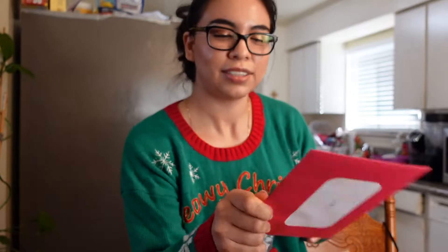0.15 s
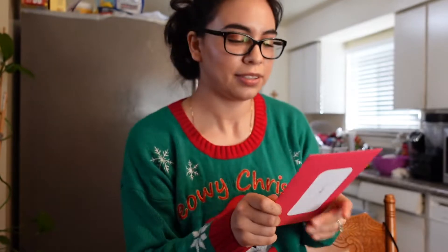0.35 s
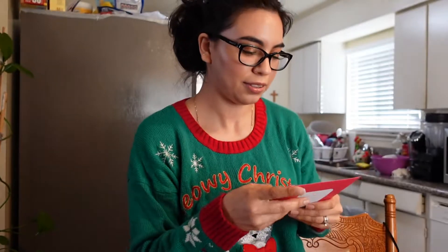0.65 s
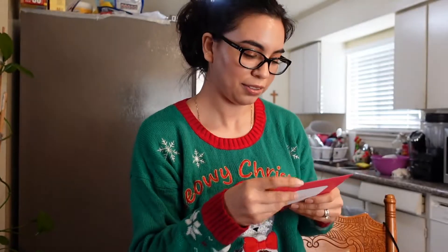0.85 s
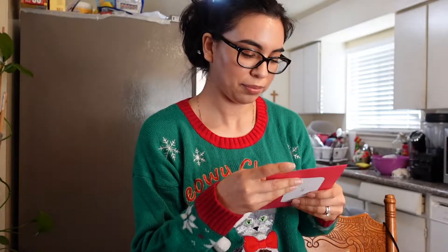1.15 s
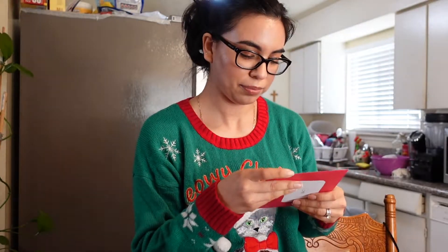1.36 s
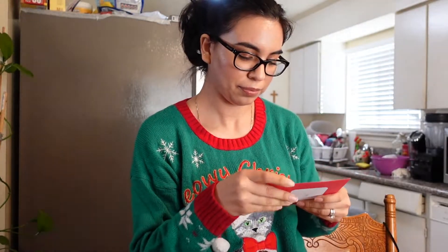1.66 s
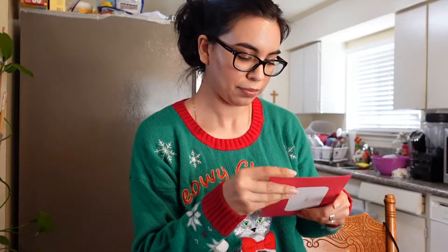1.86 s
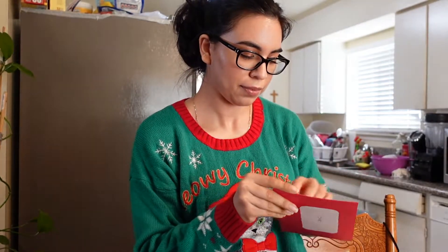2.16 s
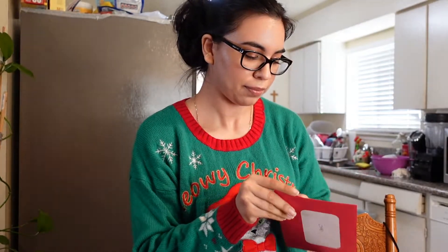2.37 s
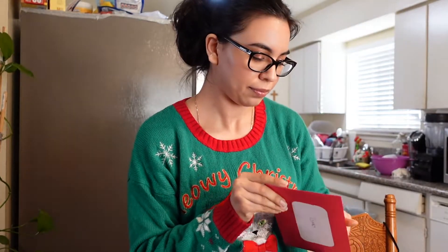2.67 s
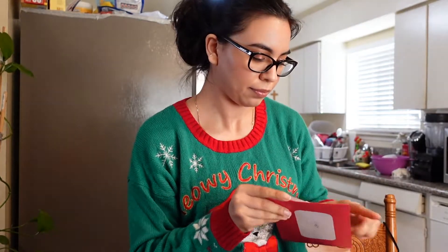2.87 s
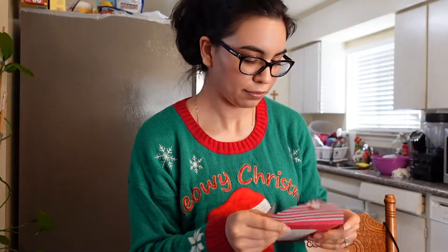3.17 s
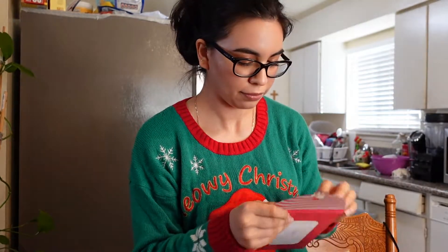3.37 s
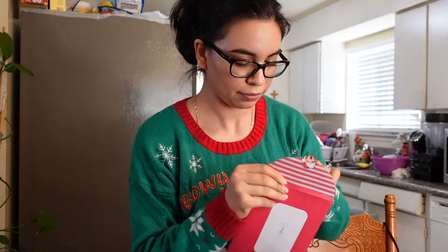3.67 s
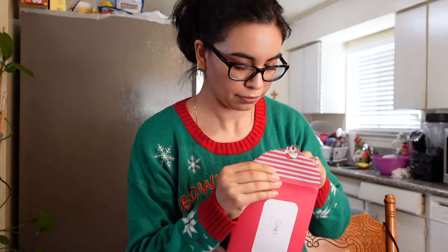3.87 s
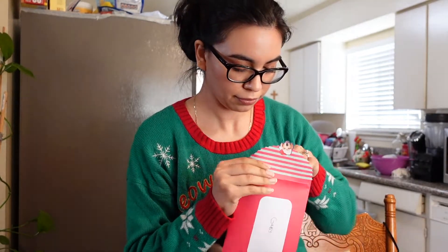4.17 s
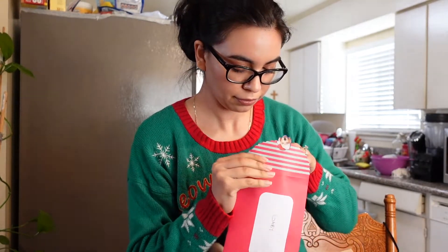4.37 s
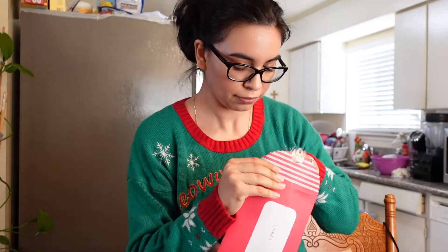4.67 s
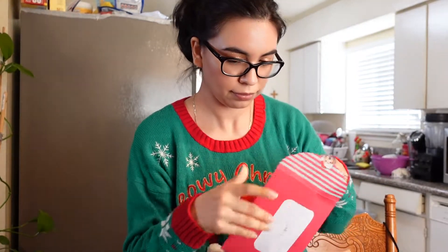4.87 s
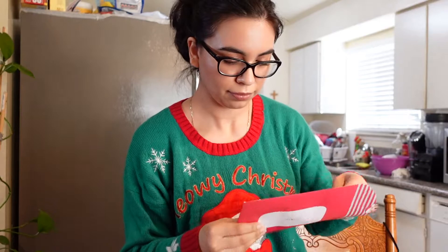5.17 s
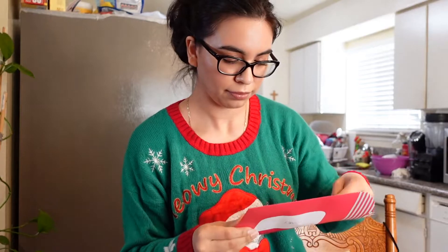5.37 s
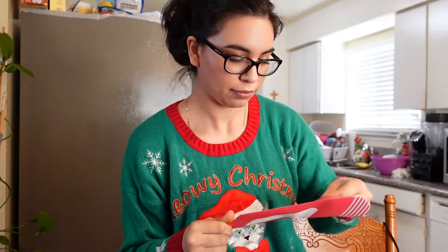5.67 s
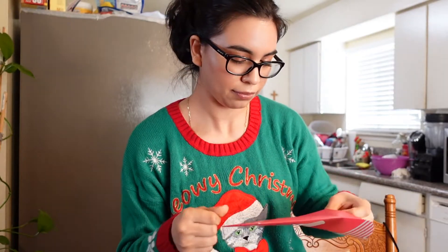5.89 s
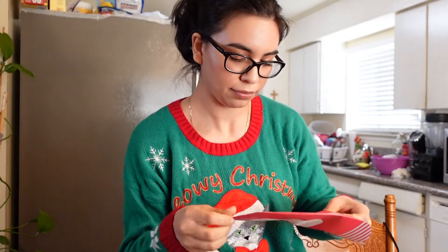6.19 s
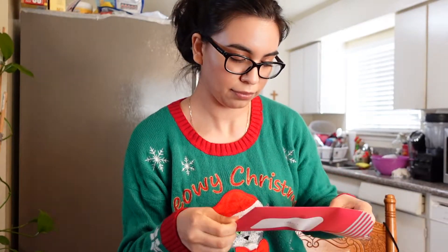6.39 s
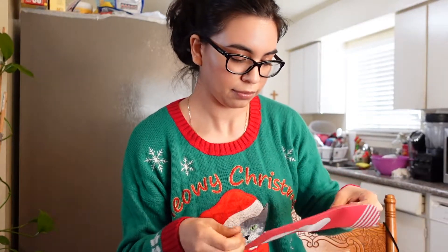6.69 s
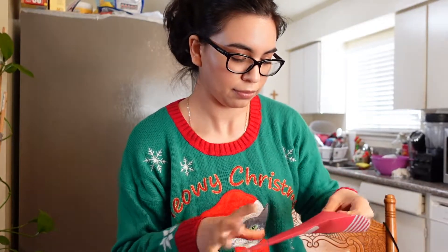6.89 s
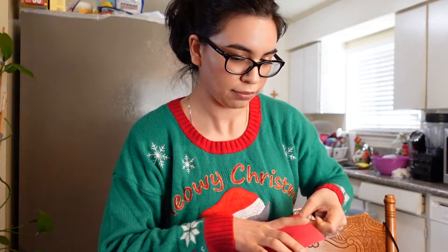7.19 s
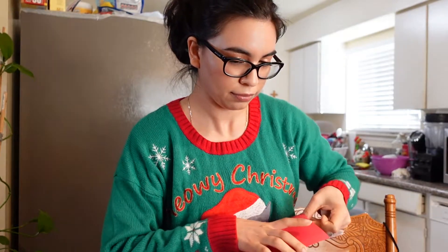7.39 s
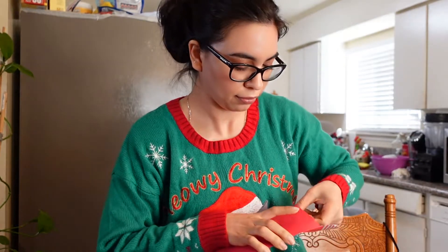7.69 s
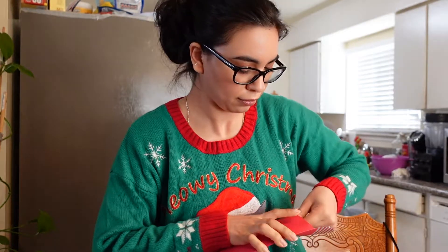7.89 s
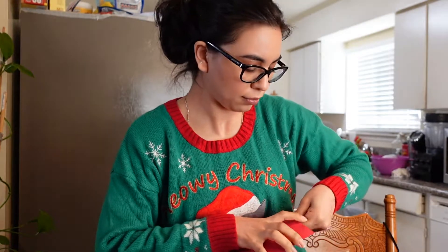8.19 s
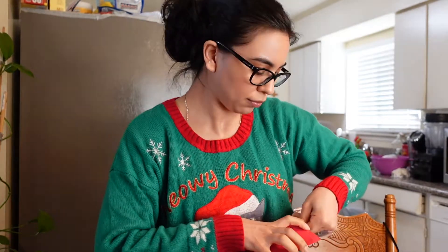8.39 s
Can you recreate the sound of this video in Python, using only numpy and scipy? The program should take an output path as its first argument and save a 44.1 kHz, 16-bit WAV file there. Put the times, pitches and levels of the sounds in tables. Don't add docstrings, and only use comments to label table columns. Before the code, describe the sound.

Dry paper sounds in a quiet kitchen, heard close. Nearly silent fingering and small creases come first, then sharp snaps, a high sticky squeal lasting under half a second, and the loudest tearing bursts around it. Later the sound thins to soft boxy rustling, isolated crackles, dull knocks and light metallic jingles, ending in sparse quiet creases over faint air and a distant hum.

```python
import sys
import numpy as np
from scipy import signal
from scipy.fft import rfft, irfft, next_fast_len
from scipy.io import wavfile
from scipy.ndimage import uniform_filter1d

SR = 44100
rng = np.random.default_rng(int(sys.argv[2]) if len(sys.argv) > 2 else 0)


def volts(x):
    e = np.asarray(x, float) / 20
    return 10 ** e


def wav_record(signal):
    frames = np.transpose(np.atleast_2d(signal))
    bounded = np.clip(frames, -1, 1)
    quanta = np.round(bounded * 32767).astype(np.int16)
    wavfile.write(sys.argv[1], SR, quanta)


N = 376613


def rms_one(x):
    return x / np.sqrt(np.mean(x ** 2) + 1e-20)


def peak_one(x):
    return x / np.abs(x).max()


def butter(x, order, hz, kind="low"):
    return signal.sosfilt(signal.butter(order, hz, kind, fs=SR, output="sos"), x)


def in_time(rows):
    s, *columns = np.transpose(rows)
    return [np.interp(np.arange(N) / SR, s, c) for c in columns]


def at_hz(points, hz):
    table_hz, values = np.transpose(points)
    return np.interp(np.log(hz), np.log(table_hz), values)


def colour(x, points):
    size = next_fast_len(N)
    hz = np.maximum(np.arange(size // 2 + 1) * SR / size, 1)
    below, above = np.maximum(points[0][0] / hz, 1), np.maximum(hz / points[-1][0], 1)
    gain = volts(at_hz(points, hz) - 9.4 * np.log2(below * above))
    return rms_one(irfft(rfft(x, size) * gain, size)[..., :N])


def drift(rate_hz):
    r = np.exp(-2 * np.pi * rate_hz / SR)
    return rms_one(signal.lfilter([1], [1, -2 * r, r * r], rng.standard_normal(N + SR))[SR:])


def resonance(x, hz, width_hz):
    r = np.exp(-np.pi * width_hz / SR)
    poles = [1, -2 * r * np.cos(2 * np.pi * hz / SR), r * r]
    return signal.lfilter([(1 - r * r) / 2, 0, (r * r - 1) / 2], poles, x)


def pair(likeness, size=N):
    fast = next_fast_len(size)
    c = np.clip(at_hz(likeness, np.arange(1, fast // 2 + 2) * SR / fast), 0, 1)
    mid, side = rfft(rng.standard_normal((2, fast)))
    mid, side = np.sqrt((1 + c) / 2) * mid, np.sqrt((1 - c) / 2) * side
    return irfft(mid + side * [[1], [-1]], fast)[:, :size]


# start_s, peak_db, sheet_ring_hz, pocket_thump_db, top_edge_db
CRACKS = [(1.682, -15.5, 4950, -29, -54), (1.9657, -18.5, 4550, -22.5, -20), (2.319, -28, 2800, -24, -55),
          (2.4292, -12.5, 2647, -24, -17), (2.5096, -20, 1570, -12.5, -27), (2.62, -12.5, 3300, -17.5, -14),
          (2.6511, -8.5, 2400, -18.5, -12.5), (2.9951, -10, 2990, -26.5, -21),
          (3.0178, -20, 1900, -12, -16), (3.2322, -37, 4320, -50, -27), (3.2388, -28, 4000, -50, -24),
          (3.273, -33.5, 2020, -34, -18), (3.3326, -26, 2550, -10, -25), (3.894, -16, 3830, -14, -40),
          (3.9084, -19, 2960, -18.5, -50), (4.581, -22.5, 2070, -21.5, -32),
          (4.701, -23.5, 2080, -12.5, -58), (5.21, -31, 4470, -17.5, -19), (5.8221, -25.5, 4600, -17, -39),
          (5.9761, -23, 4360, -19, -29), (7.1679, -30.5, 1870, -16.5, -28), (7.2196, -31.5, 3600, -11, -32),
          (7.868, -32, 2150, -15.5, -14.5), (8.2037, -30, 2900, -14, -27), (8.3826, -35, 4570, -16, -25)]
# start_s, peak_db, sheet_ring_hz, pocket_thump_db
CREASES = [(0.4464, -37, 2760, -15), (.456, -37, 4500, -14), (1.4524, -36.5, 3700, -57),
           (3.491, -43, 1380, -3), (3.5823, -38, 3600, -8), (3.599, -29.5, 1340, -7),
           (3.6223, -49.5, 1310, 11.5), (3.7215, -46.5, 1270, 8), (3.879, -32, 905, -21),
           (4.3106, -40.5, 2000, -5), (4.3675, -49, 2880, -1), (4.6312, -36, 2600, -5),
           (4.858, -39, 2420, -11.5), (5.1073, -45, 2520, -17), (5.567, -40.5, 2700, -24),
           (6.2884, -46, 4350, -12), (6.545, -45, 3360, -18), (6.774, -43, 2520, -18),
           (6.834, -43.5, 1530, -16), (6.888, -44.5, 1180, -7.5), (7.5328, -38.5, 4300, -16),
           (7.567, -36.5, 1390, -20), (7.7075, -43, 1987, -43)]
# start_s, peak_db, sheet_ring_hz
TICKS = [(0.09, -57, 1710), (1.953, -28, 8500), (2.4225, -33, 5740), (2.464, -19.5, 10200),
         (2.469, -29, 10500), (2.585, -46, 11000), (3.665, -53, 5500), (0.3264, -44, 6940),
         (0.889, -47, 1550), (1.2964, -43.5, 10300), (1.385, -48, 2290), (1.595, -48, 6000),
         (2.9504, -39, 3060), (4.1522, -46, 1610), (5.032, -45, 8980), (5.686, -64, 10300),
         (5.718, -51, 11000), (6.145, -37, 9000), (6.305, -63, 4500), (6.42, -46.5, 7150),
         (6.981, -42, 1000), (7.197, -36.5, 1190)]
# start_s, peak_db, sheet_ring_hz, pocket_thump_db, rip_ms
RIPS = [
    (1.977, -24.5, 4570, -32, 9.3),
    (2.452, -17.5, 3570, -31, 17),
    (2.4628, -18.5, 4740, -28, 7),
    (2.661, -12.5, 3040, -33, 9.7),
    (3.0105, -12.5, 5700, -23, 8.8),
    (3.79, -40, 1260, -2, 13),
    (4.65, -32.5, 1770, -12, 16),
    (7.354, -43, 1800, -20, 8),
    (7.7473, -36, 2770, -22, 2.3),
]
CRACK_MS, CREASE_MS, TICK_MS = 1.73, 1.72, 2.4
CREASE_EDGE_DB, TICK_EDGE_DB, RIP_EDGE_DB, TICK_THUMP_DB = -20.5, -14.5, -41, -34


def crease_rows():
    rows = [(*r, CRACK_MS) for r in CRACKS]
    rows += [(*r, CREASE_EDGE_DB, CREASE_MS) for r in CREASES]
    rows += [(*r, TICK_THUMP_DB, TICK_EDGE_DB, TICK_MS) for r in TICKS]
    return rows + [(*r, RIP_EDGE_DB, rip_ms) for *r, rip_ms in RIPS]


# pitch_hz, width_hz, level_db
POCKET = [(230, 90, -14), (640, 70, 0), (1270, 220, -9), (1850, 170, -7)]


def pocket(x):
    return sum(volts(db) * (-1) ** k * resonance(x, hz, width) for k, (hz, width, db) in enumerate(POCKET))


KNEE_HZ, KNEE_PER_RING = 1200, 1.64


def snap(ring_hz, thump_db, edge_db, rip_ms):
    t = np.arange(2048) / SR
    crack, push = rng.standard_normal((2, len(t)))
    age = 1000 * t / np.clip(rip_ms, .2, 14)
    burst = 0.42 * crack * np.abs(push) ** 1.57 * np.exp(-age) * (1 - np.exp(-3.5 * age))
    burst[0] = np.clip(1.31 / rip_ms, 0, 1) ** 2
    lines = rfft(burst)
    burst = irfft(lines / np.abs(lines), len(t)) * np.exp(-age / 4)
    knee_hz = np.clip(KNEE_HZ + KNEE_PER_RING * ring_hz, 2000, 9000)
    middle = butter(burst, 3, [500 + 0.28 * ring_hz, knee_hz], "band")
    edge = butter(burst, 2, [.8 * knee_hz, 15000], "band")
    ring = resonance(burst, ring_hz, 0.4 * ring_hz)
    ring = ring + 0.42 * resonance(burst, 1.76 * ring_hz, 0.65 * ring_hz)
    body = peak_one(butter(peak_one(middle) + 4.9 * peak_one(ring), 2, 0.99 * knee_hz))
    thump = pocket(push * np.exp(-t / .003))
    return body + volts(edge_db + 9.5) * peak_one(edge) + volts(thump_db + 6) * peak_one(thump)


def creases():
    out = np.zeros(N + 2048)
    for s, db, *shape in crease_rows():
        out[round(s * SR):][:2048] += volts(db + 1.0) * snap(*shape)
    return out[:N]


# start_s, peak_db, pitch_hz
THUMPS = [(.205, -60, 474), (0.261, -47.5, 480), (2.458, -42.5, 211), (2.665, -45, 205), (3.336, -42, 434),
          (3.594, -33, 484), (3.895, -26.5, 624), (5.981, -57, 112), (7.194, -35.5, 253), (7.221, -54, 170),
          (7.265, -51, 300)]
# start_s, peak_db, pitch_hz, width_hz
RINGS = [(.251, -48.5, 6900, 450), (1.683, -32, 1150, 600), (2.001, -53, 645, 350), (7.2, -42, 690, 200),
         (.257, -48, 10540, 350), (.331, -43, 9500, 1200), (1.292, -48, 10530, 400),
         (1.298, -57, 10500, 150), (1.298, -58, 7070, 150), (1.388, -46, 10600, 450), (.082, -62, 1710, 90),
         (.118, -62, 1960, 89), (.125, -57, 2870, 150), (.215, -49.5, 463, 90), (.372, -52, 2550, 300),
         (4.382, -52, 633, 80), (4.412, -48, 610, 80), (4.545, -46.5, 620, 80), (4.662, -39.5, 643, 49.7),
         (6.145, -50.5, 1510, 200), (2.43, -17, 2420, 504), (2.6215, -10.5, 5000, 2000),
         (2.6513, -10, 5000, 1500), (2.6612, -11.5, 2310, 700), (2.661, -7, 5370, 1800),
         (2.667, -13, 6000, 2500), (2.47, -32.5, 565, 151), (2.997, -14, 8700, 3000),
         (3.582, -35.5, 5500, 1500), (3.8945, -25, 2330, 500), (3.909, -17, 4470, 1500),
         (3.909, -27, 2080, 500), (4.311, -36.5, 620, 250), (5.8226, -25, 2730, 550),
         (5.9766, -19.5, 2420, 600), (7.194, -37.5, 524, 300), (8.3826, -28.5, 1520, 600),
         (8.2036, -23.5, 3640, 884), (8.3826, -28, 4150, 1200),
         (0.267, -56, 10800, 400), (.266, -53, 7700, 500), (.332, -53, 13000, 900),
          (1.387, -41, 6040, 4000), (1.433, -50, 2740, 250), (1.4532, -33.5, 8000, 5000),
          (1.683, -26, 10500, 1500), (1.9662, -15.5, 6800, 1500), (1.968, -22, 3800, 600),
          (1.966, -32, 9600, 1200), (2.43, -20, 7750, 1200), (2.4337, -28, 8000, 900),
          (2.6205, -26, 696, 300), (2.621, -22, 2160, 900), (2.6252, -12, 7000, 4000),
          (2.9983, -16.5, 2660, 450), (3.0132, -21, 5460, 600), (3.018, -17, 3470, 3500),
          (3.666, -42, 5500, 4000), (3.878, -38, 1600, 1500), (3.79, -42, 3140, 500),
          (3.795, -44, 5200, 700), (3.8943, -25, 1550, 500), (4.357, -43, 3280, 1500),
          (4.37, -42, 2200, 2000), (4.435, -54, 1810, 300), (4.6315, -31, 2600, 2500),
          (4.65, -34, 1830, 250), (4.67, -38, 650, 120), (4.705, -36, 3800, 600), (5.8226, -27, 5070, 1200),
          (5.8229, -32, 1920, 300), (5.9766, -27.5, 5650, 1000), (8.2045, -28, 2180, 500),
          (8.2095, -28, 2300, 700), (8.205, -46.5, 222, 119), (8.3816, -25, 3090, 800),
          (8.3826, -37, 5000, 800)]


def rings():
    blow = np.arange(2048) == 0
    out = np.zeros(N + len(blow))
    thumps = [(s, db, hz, 0.5 * hz) for s, db, hz in THUMPS]
    for s, db, hz, width_hz in thumps + RINGS:
        tone = resonance(resonance(blow, hz, width_hz), hz, width_hz)
        out[round(s * SR):][:len(blow)] += volts(db) * peak_one(tone)
    return volts(1.0) * out[:N]


def crackle(per_s, spread_db, smooth_db):
    sizes = volts(spread_db * np.minimum(rng.exponential(1, N), 5)) * rng.choice([-1, 1], N)
    cracks = sizes * (rng.random(N) < per_s * volts(6 * drift(25)) / SR)
    return rms_one(cracks) + volts(smooth_db + 4.77 * drift(34.0)) * rng.standard_normal(N)


STROKE_FADE_DB, STROKE_ROUND, STROKE_RISE = 17, 0.95, 0.76


def strokes(rows, rest_db, extra_db=0):
    s, length, db = np.transpose(rows)[:3, :, None]
    t = np.arange(0, N + 64, 64) / SR
    away = np.abs(t - s) / (length / 2 * np.where(t < s, STROKE_RISE, 1))
    power = volts(db + np.reshape(extra_db, (-1, 1)) - STROKE_FADE_DB * away ** STROKE_ROUND) ** 2
    return np.interp(np.arange(N) / SR, t, np.sqrt(power.sum(axis=0) + volts(rest_db) ** 2))


# middle_s, length_s, rustle_db, hiss_over_rustle_db
SLIDES = [(0.124, 0.18, -61, -10.5), (0.377, 0.083, -58, -24), (0.56, 0.35, -72, 10.5),
          (0.73, 0.19, -58, -3), (0.907, 0.13, -78, 14), (1.038, 0.26, -80, 14), (1.402, 0.22, -63.5, -5.5),
          (1.714, 0.33, -57, 1), (1.96, 0.13, -58.5, 10.5), (2.054, 0.61, -44.5, -28),
          (2.473, 0.15, -31, -11), (2.676, 0.16, -29.5, -8), (2.923, 0.65, -58.5, -8.5),
          (3.086, 0.28, -60, 6.5), (3.313, 0.25, -43, -39), (3.78, 0.11, -50, -16),
          (3.97, 0.23, -46.5, -17.5), (4.163, 0.14, -54.5, -21), (4.354, .1, -56, -31),
          (4.462, 0.1, -50.5, -33), (5.008, 0.32, -54, -24), (5.183, 0.3, -49, -10), (5.34, 0.28, -53, -21),
          (5.63, 0.34, -53, -38), (5.915, 0.52, -51.5, -17.5), (6.315, 0.16, -57.5, -27),
          (6.639, 0.087, -55.5, -34), (6.838, 0.35, -58, -11), (7, 0.1, -56.5, -7), (7.073, 0.66, -65, 3),
          (7.551, 0.16, -49.5, -14), (7.759, 0.097, -42.5, -18.5), (7.925, 0.51, -47, -17),
          (8.233, 1, -52, -44), (8.524, 0.18, -54.5, -31)]
# middle_s, length_s, boom_db, rustle_over_boom_db
REACHES = [(0.108, 0.092, -53, -15), (0.253, 0.21, -64, 1.5), (0.375, 0.13, -55.5, -13),
           (0.603, 0.97, -59, -29), (1.745, 0.23, -69, -15), (2.14, 0.22, -58, -16),
           (2.463, 0.11, -28, -1.5), (3.096, 0.24, -42.5, -3), (3.342, 0.19, -57, -15),
           (3.617, 0.42, -51, 2), (3.811, 0.11, -37.5, -14), (4.142, 0.8, -58, -5.5),
           (4.38, 0.35, -44.5, -9.5), (4.563, 0.16, -40.5, -7), (4.67, 0.37, -47, 7.5),
           (5.34, 0.091, -54, -13), (6.017, 0.097, -49.5, 5), (7.203, 0.18, -44, 0),
           (7.368, 0.23, -50, -1.5), (7.684, 0.25, -57, -13), (7.943, 0.3, -54, -12), (8.354, 1, -54, -3)]
# middle_s, length_s, rumble_db
LEANS = [
    (2.47, 0.11, -60),
    (2.66, 0.14, -68),
    (3.72, 0.3, -58),
    (4.12, 0.29, -59),
    (4.45, 0.97, -60),
    (5.85, 0.3, -56.5),
    (7.23, 0.21, -45.5),
    (7.4, 1, -60.5),
]
# pitch_hz, density_db
RUSTLE = [(410, 2), (700, -1), (1090, 1), (1810, 3.5), (1940, 7), (2890, 7.5), (4120, 8.5), (8000, -1.5),
          (10400, -10), (17600, -120)]
# pitch_hz, density_db
HISS = [(4000, 2.5), (6000, 6), (8000, 0.5), (11000, 1.5), (15500, -15)]
REST_RUSTLE_DB, REST_BOOM_DB, REST_HISS_DB, REST_RUMBLE_DB = -112.5, -79.5, -84, -70


def handling():
    slide_rustle = strokes(SLIDES, REST_RUSTLE_DB)
    reach_rustle = strokes(REACHES, REST_RUSTLE_DB, np.array(REACHES)[:, 3])
    hiss = strokes(SLIDES, REST_HISS_DB, np.array(SLIDES)[:, 3])
    grains = crackle(per_s=990, spread_db=2.0, smooth_db=-3.5)
    sheet = volts(-0.5) * np.hypot(slide_rustle, reach_rustle) * colour(grains, RUSTLE)
    surface = volts(8.0) * hiss * colour(grains, HISS)
    boom = rms_one(pocket(crackle(per_s=180, spread_db=9.0, smooth_db=3.5)))
    boom = volts(-3.5) * strokes(REACHES, REST_BOOM_DB) * boom
    rumble = colour(rng.standard_normal(N), [(50, -25.5), (110, -9.0), (250, -9.0)])
    return sheet + surface + boom + volts(-1) * strokes(LEANS, REST_RUMBLE_DB) * rumble


# start_s, pitch_hz, level_db, wobble_share, overtones_db
RUB = [
    (.48, 1580, -78, 0.026, -9),
    (.54, 1565, -64, 0.047, -3),
    (.62, 1553, -67, 0.059, 23),
    (.8, 1592, -67.5, 0.053, -9),
    (.92, 1530, -72, 0.026, -9),
    (.96, 1510, -85, .04, -6),
]
TUG = [
    (1.93, 1624, -99, 0.0024, 4),
    (1.942, 1602, -34, 0.0026, 0),
    (1.968, 1657, -44, 0.0058, -2),
    (1.985, 1539, -40, 0.021, -10),
    (2.035, 1600, -41.5, 0.081, -4),
    (2.07, 1680, -43, 0.079, -10),
    (2.093, 1801, -35, 0.034, -10),
]
SQUEAL = [
    (2.103, 1882, -25.5, 0.011, -7),
    (2.131, 1889, -30.5, 0.0099, 3),
    (2.139, 1730, -33, 0.035, 7),
    (2.173, 1715, -29, 0.039, 7),
    (2.209, 1745, -40.5, 0.035, 18),
    (2.24, 1765, -55, 0.033, 12),
    (2.289, 1750, -56, 0.03, 20.5),
    (2.327, 1660, -48, 0.082, 10.5),
]
STRAND = [(2.028, 1850, -56, 0.023, -9), (2.042, 1982, -35, 0.06, -7), (2.06, 2037, -54, 0.031, -9),
          (2.085, 1900, -66, 0.029, -9), (2.12, 1895, -68, .012, 4), (2.13, 1913, -42, 0.011, 4),
          (2.15, 1932, -50, 0.018, 5), (2.18, 1912, -39, 0.027, 9), (2.2, 1970, -32.5, 0.042, 11),
          (2.225, 1935, -53, 0.03, 7.5), (2.26, 1936, -56, 0.043, 24), (2.3, 1960, -58, .035, 18)]
# multiple, level_db
SQUEAL_ORDERS = [(1, -0.5), (2, -5), (3, -43), (4, -15), (5, -33)]
FLAP_HZ, FLAP_WIDTH_HZ, FLAP_DB = 5000, 670, 21.5


def squeal(rows):
    hz, db, wobble, sharp_db = in_time(rows)
    jitter = drift(220)
    jitter = jitter - uniform_filter1d(jitter, size=900)
    phase = 2 * np.pi * np.cumsum(hz * (1 + wobble * jitter)) / SR
    tone = np.zeros(N)
    for k, order_db in SQUEAL_ORDERS:
        if k % 2 == 0:
            order_db = order_db + sharp_db - 238 * k * wobble
        elif k > 1:
            order_db = order_db + 220 * wobble
        tone += volts(order_db) * np.sin(k * phase)
    first_s, last_s = rows[0][0], rows[-1][0]
    sounding = np.abs(np.arange(N) / SR - (first_s + last_s) / 2) < (last_s - first_s) / 2
    tone = butter(tone, 4, 8500)
    tone = tone + volts(FLAP_DB) * resonance(tone, FLAP_HZ, FLAP_WIDTH_HZ)
    return np.sqrt(2) * sounding * volts(db + 10 * wobble * drift(63)) * tone


# middle_s, length_s, level_db
BUZZ = [
    (2.115, .08, -47),
    (2.145, .08, -46),
    (2.18, .09, -43),
    (2.225, .12, -49),
]
# pitch_hz, width_hz, level_db
BUZZ_BANDS = [(5100, 260, 0.5), (5570, 300, -4.5), (4280, 250, -10), (7000, 600, -21.5), (8500, 600, -32)]


def buzz():
    shake = rng.standard_normal((2, N)) + 2 * rng.standard_normal(N)
    bands = 0
    for hz, width, db in BUZZ_BANDS:
        bands = bands + volts(db) * rms_one(resonance(resonance(shake, hz, width), hz, width))
    return strokes(BUZZ, -130) * volts(3 * drift(80)) * bands


# start_s, level_db, favoured_pitch_hz
TINKLES = [(3.154, -45.5, 6455), (3.185, -46, 6470), (3.544, -50, 6540), (3.575, -47, 6455),
           (3.62, -47, 6455), (4.17, -65, 12000), (4.185, -66, 10300), (4.232, -65, 6455),
           (4.25, -49, 10900), (4.265, -63, 6455), (4.295, -49, 4878), (4.31, -57, 11500),
           (4.141, -52, 11400), (4.201, -57, 11300), (4.226, -43, 4878), (4.245, -48, 4878),
           (4.277, -56, 10700), (5.247, -41.5, 6455), (7.26, -53, 6455)]
# pitch_hz, t60_s
BELL = [(4890, .2), (6480, .1), (10340, .12), (12420, .12)]
BELL_SPLIT = 0.0113
OFF_MODE_DB_PER_OCTAVE = 36


def bells():
    s, db, favoured_hz = np.transpose(TINKLES)
    out = np.zeros(N)
    for hz, t60 in BELL:
        off_db = OFF_MODE_DB_PER_OCTAVE * np.abs(np.log2(hz / favoured_hz))
        touches = np.full(N, 1e-18)
        touches[(s * SR).astype(int)] = volts(db - 33.5 - off_db)
        rattle = signal.lfilter([1], [1, -np.exp(-1 / (0.0096 * SR))], touches) * rng.standard_normal(N)
        r = volts(-60 / (t60 * SR))
        for share, mode_hz in ((0.66, hz), (0.47, hz * (1 - BELL_SPLIT))):
            w = 2 * np.pi * mode_hz / SR
            out += share * signal.lfilter([0, np.sin(w)], [1, -2 * r * np.cos(w), r * r], rattle)
    return out


# pitch_hz, t60_s
ROOM_T60 = [(200, 0.52), (600, 0.39), (1400, 0.36), (3700, 0.36), (9700, 0.29), (16000, 0.29)]
# pitch_hz, likeness
ROOM_LIKENESS = [(100, 0.93), (600, 0.71), (2000, 0.95), (8000, 0.8), (16000, 1)]
ROOM_DB = 1


def room_tail():
    t = np.arange(SR // 2) / SR
    noise, tail = pair(ROOM_LIKENESS, size=len(t)), 0
    edges = 60 * 2 ** np.arange(0, 8.6, .5)
    for low, high in zip(edges, edges[1:]):
        band = butter(noise, 2, [low, high], "band")
        tail = tail + band * volts(-60 * t / at_hz(ROOM_T60, np.sqrt(low * high)))
    tail = tail * (1 - np.exp(-t / 0.00021))
    return volts(ROOM_DB) * tail / np.sqrt(np.sum(tail ** 2) / 2)


# delay_s, level_db, left_right_db
ECHOES = [
    (.0055, -5, -3.5),
    (.0105, -13, -7),
    (0.0134, -12, -6),
    (.021, -68, -7),
]
PAPER_PAN_DB, SHADOW_HZ = -2, 8260
GLINT_DB, GLINT_HZ = -9, 5000


def kitchen(x, smear_ms, beamed=np.zeros(N)):
    response = room_tail()
    for s, db, pan_db in ECHOES:
        response[:, round(s * SR)] += volts([db + pan_db / 2, db - pan_db / 2])
    table_s, table_db, _ = ECHOES[0]
    lag = round(table_s * SR)
    response += volts(GLINT_DB) * butter(np.arange(SR // 2) == lag, 2, GLINT_HZ, "high")
    late = np.arange(N) - smear_ms * SR / 1000 * (3 + drift(5.91))
    moved = np.interp(late, np.arange(N), x)
    echoed = signal.fftconvolve(moved[None], response, axes=1)[:, :N]
    echoed[:, lag:] += volts(table_db) * beamed[:-lag]
    direct = butter(x + beamed, 2, SHADOW_HZ)
    return direct * volts([[PAPER_PAN_DB / 2], [-PAPER_PAN_DB / 2]]) + echoed


# pitch_hz, density_db
QUIET = [(15, -67), (25, -23), (70, -25.5), (153, -6), (212, -10), (277, -11.5), (354, 3), (516, -4.5),
         (734, -10), (887, -9), (1160, -16.5), (1610, -12), (5430, -26.5), (14400, -29), (16000, -27)]
QUIET_DB = -60.5
# pitch_hz, likeness
AIR_LIKENESS = [(100, 0.91), (600, 0.13), (2000, 0.1), (8000, 0.28), (16000, 0.98)]
# pitch_hz, width_hz, level_db
DRONE = [(216.3, 8.9, -70), (354, 9.5, -67), (913, 81, -70)]


def background():
    air = volts(QUIET_DB) * colour(pair(AIR_LIKENESS), QUIET)
    source = pair(AIR_LIKENESS)
    return air + sum(volts(db) * rms_one(resonance(source, hz, width)) for hz, width, db in DRONE)


RING_ROOM_SHARE = .55


def scene():
    moving = kitchen(volts(-4) * (handling() + squeal(RUB)), smear_ms=.6)
    glue = squeal(TUG + SQUEAL) + squeal(STRAND)
    glue = kitchen(volts(-5.5) * glue, smear_ms=0)[::-1]
    touched = rings()
    struck = creases() + RING_ROOM_SHARE * touched + volts(7.5) * bells()
    struck = kitchen(struck, smear_ms=0, beamed=(1 - RING_ROOM_SHARE) * touched)
    return struck + moving + glue + background() + buzz()


def roll_off(x):
    return signal.sosfilt(signal.butter(12, 16810, fs=SR, output="sos"), x)


def record(dry):
    mid, side = (dry[0] + dry[1]) / 2, (dry[0] - dry[1]) / 2
    side = 0.72 * side + 1.11 * butter(side, 2, 1100, "high")
    heard = butter([mid + side, mid - side], 1, 70, "high")
    heard = signal.sosfilt(signal.cheby2(10, 50, 16800, fs=SR, output="sos"), heard)
    return roll_off(heard)


dry = scene()
out = record(dry)
wav_record(out)
```